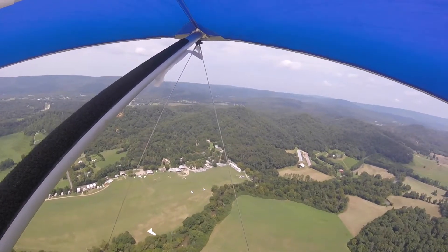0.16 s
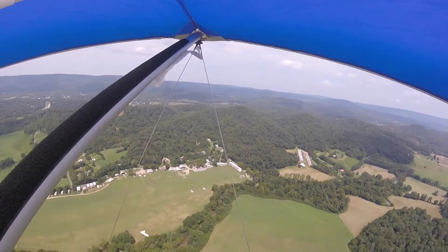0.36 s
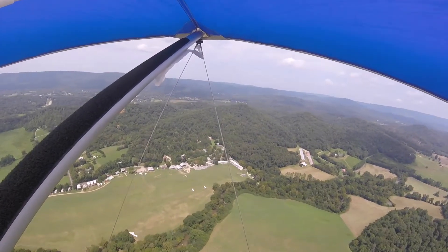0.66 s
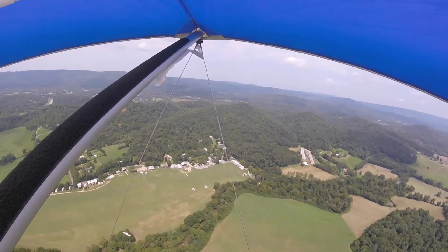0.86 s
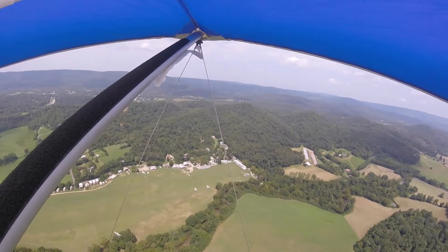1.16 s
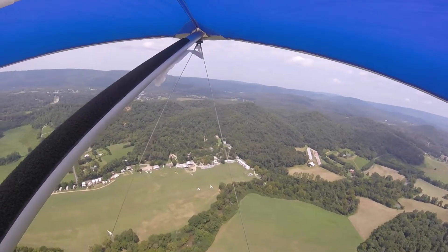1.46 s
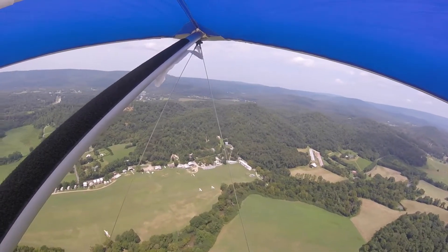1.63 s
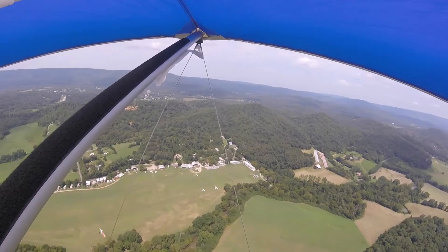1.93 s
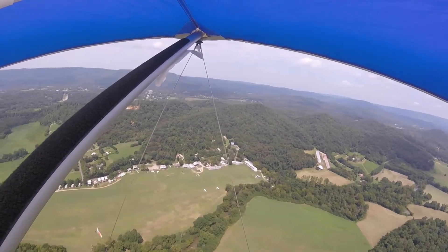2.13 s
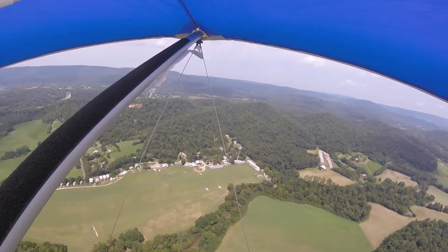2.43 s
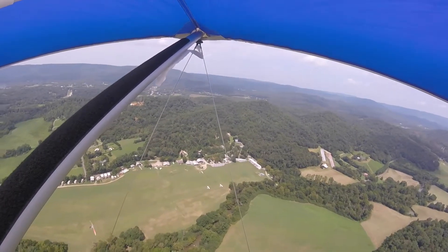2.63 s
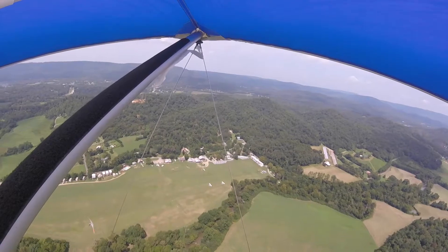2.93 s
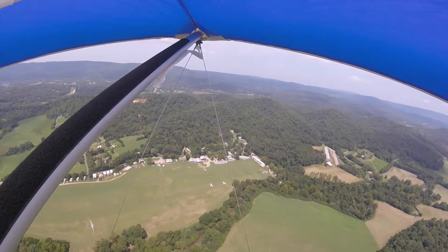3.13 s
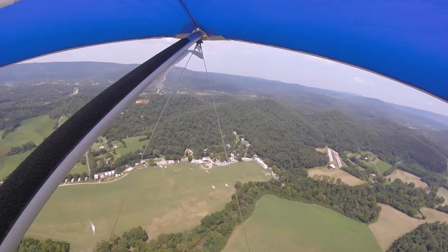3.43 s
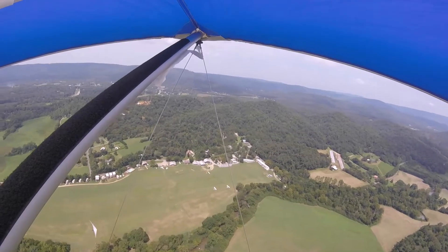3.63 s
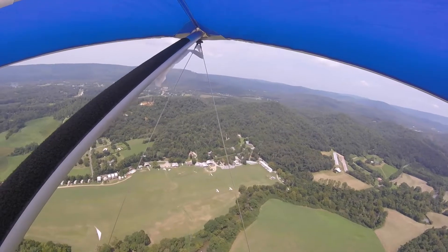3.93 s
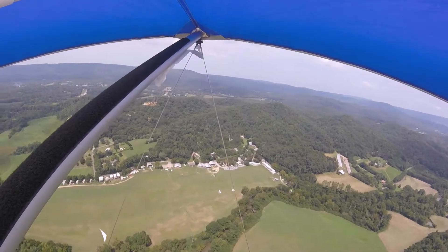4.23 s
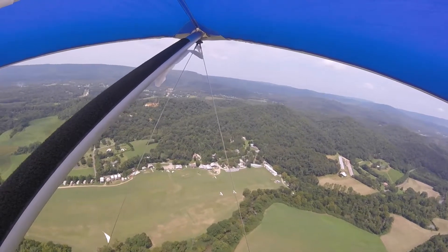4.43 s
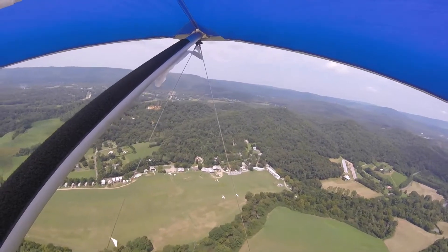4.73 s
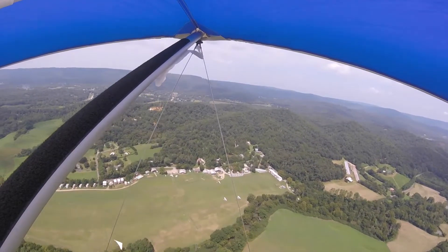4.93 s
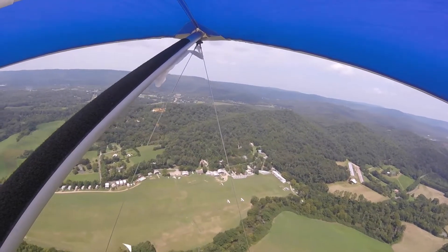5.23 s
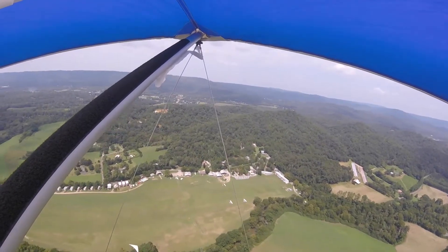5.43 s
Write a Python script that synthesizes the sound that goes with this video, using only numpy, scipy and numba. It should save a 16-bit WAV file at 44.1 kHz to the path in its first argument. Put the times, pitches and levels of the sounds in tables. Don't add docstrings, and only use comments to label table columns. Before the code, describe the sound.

Close, dry outdoor wind on a small microphone mounted under a hang glider's wing, with no echo. From 0 to about 1.6 seconds, deep irregular rumble and crowded low thumps dominate, strongest around 0.8 to 1.4, while a loose sail edge flaps about 21 times a second, a quick buzzing flutter with a papery snap, hollow cloth tone and low tube ring. A tiny sharp tick from a fitting comes at 1.3. From 1.7 to 3 the gusts calm and the flutter is softer and uneven, nearly fading just before 3. From 3.1 it returns as a fairly regular, firmer purr with brief dips, over scattered soft bumps, with very faint ticks at 3.7 and 4.4. Heavier blows hit at about 4.9 and 5.15, and a strong low gust closes at 5.55. Steady soft hiss with a faint high whistle runs throughout, slightly brighter from 3.6.

```python
import sys
import numpy as np
from scipy import signal
from scipy.fft import rfft, irfft
from scipy.io import wavfile
from scipy.ndimage import uniform_filter1d
from numba import njit

SR = 44100
rng = np.random.default_rng(int(sys.argv[2]) if len(sys.argv) > 2 else 0)


def master_out(mix):
    frames = np.transpose(np.atleast_2d(mix))
    ceiling = np.clip(frames, -1, 1)
    pcm = np.round(ceiling * 32767).astype(np.int16)
    wavfile.write(sys.argv[1], SR, pcm)


def voltage_ratio(level):
    return 10 ** (np.asarray(level, float) / 20)


N = 245637

# start_s [s], level_db [dB]
AIRSPEED = [
    (0.0, -59.5),
    (0.08, -62),
    (1.19, -61),
    (1.42, -63),
    (3.59, -60.5),
    (4.82, -60),
    (5.5, -61),
    (5.55, -61.5),
]
# pitch_hz [Hz], density_db [dB per Hz]
RUSH_COLOUR = [(200, 3), (400, 4.5), (800, -1.5), (1100, -9), (1500, -13.5), (2100, -20)]
# pitch_hz [Hz], density_db [dB per Hz]
HISS_COLOUR = [(880, -32.5), (1500, -9), (2430, -6), (3930, -2.5), (5050, -9.5), (5960, -8.5), (6480, -2.5),
               (7240, -12), (9210, -18), (10200, -25), (12100, -21), (13700, -26.5)]
# start_s [s], peak_db [dB]
TICKS = [
    (1.298, -26),
    (3.735, -41),
]
# start_s [s], strength_db [dB], finer_share_db [dB]
GUST = [(0, -25.5, -9.5), (.3, -33.5, -3.5), (.55, -24, -16), (.9, -27.5, -6), (1.15, -26.5, -7),
        (1.62, -26.5, -10), (1.72, -31.5, -16), (2.3, -34.5, -14.5), (2.65, -34.5, -14.5),
        (2.82, -28, -15.5), (3.1, -31.5, -20.5), (3.42, -31.5, -7), (3.72, -32.5, -11), (4.1, -34, -11),
        (4.6, -31.5, -14.5), (4.98, -32.5, -13), (5.35, -36, -10.5), (5.57, -17.5, -30)]
# pitch_hz [Hz], density_db [dB per Hz]
EDDY_COLOUR = [(15, 0), (32, -1), (75, -2), (110, 1.5), (170, -4.5), (250, -4), (350, -14.5), (550, -25),
               (800, -46)]
# centre_s [s], height_db [dB], half_width_ms [ms]
PUSHES = [(0.008, -22, 22), (0.021, -21, 2.8), (0.051, -21, 2.6), (0.066, -15, 3.3),
          (0.075, -19, 2.2), (0.215, -21, 2.2), (0.229, -16.5, 3.3), (0.278, -18.5, 1.9),
          (0.3, -15.5, 3.9), (0.341, -22, 4.4), (0.356, -13.5, 2.5), (0.392, -20, 2.5),
          (0.417, -15.4, 3.3), (0.438, -18.5, 3), (0.45, -16, 5.4), (0.48, -15.3, 2.4),
          (0.525, -12.5, 4), (0.566, -13.5, 3.1), (0.603, -12, 3.3), (0.659, -13.3, 2.7),
          (0.713, -12.5, 1.7), (0.76, -16, 3.6), (0.776, -19, 1.9), (0.797, -13, 2.4),
          (0.833, -8.5, 2.4), (0.864, -13.5, 2.9), (0.895, -14, 2.5), (0.909, -17.5, 2.4),
          (0.967, -15, 2.8), (1.002, -13.5, 7.5), (1.054, -10.5, 2.1), (1.063, -14.5, 3.1),
          (1.097, -14, 1.5), (1.118, -13, 4.6), (1.151, -8, 1.53), (1.166, -10.5, 3.3),
          (1.182, -19, 4.9), (1.205, -14, 2.8), (1.229, -19, 2.1), (1.281, -12, 1.8),
          (1.336, -13.5, 3.3), (1.366, -16.4, 1.5), (1.376, -13.4, 2), (1.44, -12, 3.7),
          (1.468, -19.5, 7.5), (1.474, -19, 3), (1.553, -18, 2.7), (1.601, -19.7, 5.6),
          (1.625, -21, 4.9), (1.632, -11.5, 2.2), (1.657, -18, 3.2), (1.812, -27, 3.3),
          (1.966, -22, 3.7), (2.06, -20.5, 6.4), (2.167, -27.3, 5), (2.19, -23.3, 8.5),
          (2.326, -23.5, 8.7), (2.439, -23, 3.9),
          (2.535, -29, 8.3), (2.586, -17, 3.1), (2.737, -24.5, 3.6), (2.78, -22.7, 2.1),
               (2.789, -15.1, 2.16), (2.84, -25, 2.5), (2.914, -30, 6.4), (3.038, -21.4, 5.4),
               (3.063, -22.5, 4.4), (3.194, -16.5, 5.3), (3.238, -20.5, 6.6), (3.264, -24, 6.7),
               (3.644, -20.5, 7), (3.71, -25, 5.8), (3.763, -26, 6.5), (3.951, -29, 7.3), (4.077, -28, 1.5),
               (4.145, -20.5, 5.5), (4.182, -25, 4.4), (4.24, -23, 10), (4.379, -18.5, 3.4),
               (4.418, -23, 6.5), (4.467, -25, 2.5), (4.67, -20, 5.6), (4.715, -20.1, 6.3),
               (4.832, -21, 7.6), (4.854, -19.5, 5.4), (4.884, -14.5, 3.3), (4.894, -10, 2.05),
               (4.901, -17, 1.9), (4.929, -20.3, 4.6), (4.981, -20.5, 3.5), (5.029, -15.5, 3.3),
               (5.038, -11.5, 4.6), (5.153, -16, 2.7), (5.164, -26, 10), (5.295, -24, 5.5),
               (5.347, -26, 6.3), (5.5, -19.5, 3.6), (5.56, -17, 4.3), (5.561, -11.5, 1.7)]
# centre_s [s], depth_db [dB], half_width_ms [ms]
PULLS = [(0.006, -17, 1.53), (0.078, -17, 7), (0.091, -20.3, 3.8), (0.109, -21.5, 5.8),
         (0.152, -14, 1.4), (0.165, -14.5, 1.7), (0.169, -19.7, 5.1), (0.235, -20, 3.7),
         (0.247, -18.5, 2.8), (0.299, -13, 1.65), (0.367, -20, 2.7), (0.377, -19.2, 2.5),
         (0.459, -22, 1.9), (0.465, -17, 1.5), (0.506, -18, 4.6), (0.666, -22, 2.3),
         (0.686, -19.4, 2.3), (0.707, -19, 4.8), (0.789, -13, 5.5), (0.805, -13, 1.43),
         (0.837, -14.5, 2.5), (0.847, -9, 1.6), (0.879, -19, 2.3), (0.934, -22, 3.4),
         (0.946, -19, 4.1), (0.95, -17, 2), (1.033, -18, 3.8), (1.039, -13, 2.2), (1.08, -14, 2.5),
         (1.133, -11.5, 2.2), (1.246, -11.5, 2.6), (1.266, -11, 3.3), (1.274, -10, 1.9),
         (1.293, -22, 3.3), (1.304, -9.5, 3.7), (1.353, -7.5, 3.2), (1.399, -16, 3.1),
         (1.445, -22, 2.5), (1.518, -14.9, 3.7), (1.574, -19, 1.9), (1.734, -27.5, 8.2),
         (1.783, -24, 3.8), (1.84, -23.5, 5.7), (1.994, -20.5, 8.4), (2.041, -26, 8.6),
         (2.142, -25, 4.2), (2.254, -32, 10), (2.346, -35, 4.4), (2.41, -29, 3.5), (2.46, -23, 8),
         (2.557, -21, 4.2), (2.606, -20, 8.4), (2.633, -23, 2.7), (2.658, -18.8, 4.5),
              (2.768, -20, 3.4), (2.794, -16, 1.43), (2.804, -20, 3.8), (2.852, -20, 5.4),
              (2.939, -17.5, 2.7), (2.96, -19.5, 3.8), (2.989, -27, 5.1), (3.23, -16, 2.5),
              (3.306, -18.8, 2.1), (3.351, -16, 7.5), (3.385, -11, 2.4), (3.401, -14.5, 5.7),
              (3.449, -12.5, 3.4), (3.471, -20, 2.6), (3.488, -24, 3), (3.54, -18.5, 4.4),
              (3.569, -16.3, 4.7), (3.589, -28, 5.8), (3.678, -20, 4), (3.79, -17, 5.2),
              (3.807, -16.5, 2.3), (3.831, -18.5, 7.5), (3.874, -18.5, 5.1), (3.899, -17.5, 4.6),
              (3.923, -14, 3), (4.017, -17.7, 4.9), (4.046, -24.0, 6.1), (4.087, -21, 3.1), (4.128, -21, 3),
              (4.135, -17.5, 2.9), (4.333, -13.5, 2), (4.358, -20.6, 4.4), (4.387, -25, 2.4),
              (4.436, -26, 2.8), (4.504, -25, 7.5), (4.543, -21, 5), (4.583, -17, 4.6), (4.606, -23.5, 9.5),
              (4.769, -24, 2.3), (4.813, -16, 3.3), (4.905, -14, 8.3), (5.11, -21, 4.9), (5.137, -16, 1.95),
              (5.141, -7.5, 1.98), (5.161, -8, 2.3), (5.175, -14, 3.1), (5.219, -14.5, 2.8),
              (5.237, -20, 4.8), (5.449, -21, 4.2), (5.469, -19.2, 4.4), (5.488, -23, 7.5),
              (5.514, -14.5, 2.4), (5.532, -18, 5.3), (5.554, -7, 2.25),
         (5.571, -23.5, 1.6),
]
# start_s [s], strength_db [dB], extra_crack_db [dB]
SNAPS = [(0.05, -36.5, 1.5), (0.1, -33, 1.5), (0.148, -29, 1.5), (0.198, -35, 1.5),
         (0.245, -31.5, 1.5), (0.289, -31.5, 1), (0.338, -32, -1), (0.386, -35, 3), (0.437, -40, -3),
         (0.485, -38.5, -2), (0.581, -43.5, 1.5), (0.62, -41, -1), (0.666, -32, -1), (0.712, -31, -1),
         (0.768, -33.5, -2), (0.818, -31, 0), (0.865, -30.5, -0.5), (0.916, -31, 2.5),
         (0.961, -27, -2.5), (1.014, -37, -1), (1.056, -35, -1), (1.176, -47, 1.5), (1.252, -37, 1.5),
         (1.296, -34, -10), (1.356, -29.5, 1), (1.408, -38, 2), (1.457, -43, 7), (1.512, -37, 2),
         (1.562, -39, 4), (1.618, -36, 3), (1.668, -39, 1.5), (1.715, -37.5, 1.5), (1.766, -45, 4),
         (1.807, -49, -2), (1.859, -48, -1),
         (1.888, -37, -1.5), (1.935, -32.5, -1.5), (1.984, -34.5, -1.5), (2.026, -36.5, -1.5),
             (2.072, -38, -1.5), (2.121, -41.5, -1.5), (2.167, -36, -1.5), (2.224, -35, -1.5),
             (2.28, -30.5, -1.5), (2.331, -35, -1.5), (2.383, -35, -1.5), (2.427, -31.5, -1.5),
             (2.473, -37, -1.5), (2.529, -34, -1.5), (2.573, -38.5, -1.5), (2.627, -44, -1.5),
             (2.73, -42.5, -1.5), (2.777, -34.5, -1.5), (2.871, -46, -1.5),
         (2.961, -50, -1.5), (3.045, -38, -1.5), (3.098, -34, -1.5), (3.208, -39.5, -1.5),
              (3.255, -33, -1.5), (3.306, -34, -1.5), (3.351, -31, -1.5), (3.398, -30.5, -1.5),
              (3.444, -32.5, -1.5), (3.486, -47, -1.5), (3.562, -34, -1.5), (3.603, -35.5, -1.5),
              (3.65, -38, -1.5), (3.701, -44, -1.5), (3.751, -38, -1.5), (3.799, -33, -1.5),
              (3.846, -31, -1.5), (3.894, -30, -1.5), (3.939, -27.5, -1.5), (3.985, -28, -1.5),
              (4.026, -36, -1.5), (4.07, -29, -1.5), (4.114, -30.5, -1.5), (4.158, -34.5, -1.5),
              (4.23, -38.5, -1.5), (4.278, -34, -1.5), (4.333, -33.5, -1.5), (4.378, -30.5, -1.5),
              (4.425, -31, -1.5), (4.472, -28, -1.5), (4.516, -32, -1.5), (4.566, -34, -1.5),
              (4.611, -37, -1.5), (4.664, -37, -1.5), (4.708, -33, -1.5), (4.756, -29, -1.5),
              (4.803, -30, -1.5), (4.848, -29.5, -1.5), (4.895, -33, -1.5), (4.939, -46, -1.5),
              (4.987, -41.5, -1.5), (5.042, -35, -1.5), (5.093, -35.5, -1.5), (5.138, -31.5, -1.5),
              (5.184, -30, -1.5), (5.228, -30, -1.5), (5.275, -27.5, -1.5), (5.321, -29.5, -1.5),
              (5.365, -31, -1.5), (5.407, -36, -1.5), (5.464, -44.5, -1.5), (5.514, -30, -1.5),
         (5.561, -30, 0.1),
]
# pitch_hz [Hz], width_hz [Hz], level_db [dB]
FRAME_MODES = [(111.5, 9.4, 24.5), (251.2, 22.6, 7), (269.3, 14, 0.5), (318.4, 45, 7.5)]
# pitch_hz [Hz], width_hz [Hz], level_db [dB]
CLOTH_MODES = [(454, 175, 4), (534, 20, 2), (614, 59, -4.5), (710, 13, -3), (1068, 80, 12.5)]
# pitch_hz [Hz], width_hz [Hz], level_db [dB]
EDGE_MODES = [(930, 230, 10), (1310, 350, 6), (1885, 290, 8.5)]
# pitch_hz [Hz], density_db [dB per Hz]
RUSTLE_COLOUR = [(250, -11), (450, 8.5), (850, 8.5), (1250, -3), (1650, -30.5), (3000, -39.5)]
COARSE_S = [.09, .6, .66, 1.72, 1.84, 1.97, 2.61, 2.74, 2.96, 3.19, 3.45, 3.57, 3.8, 4.03, 5.05]


def level(x, db):
    return x * voltage_ratio(db) / np.sqrt(np.mean(x ** 2))


@njit
def bandpass(x, hz, width):
    y, band, low = np.empty(len(x)), 0., 0.
    g, damping = np.tan(np.pi * hz / SR), width / hz
    for i in range(len(x)):
        v = (band + g * (x[i] - low)) / (1 + g * (g + damping))
        band, low = 2 * v - band, low + 2 * g * v
        y[i] = damping * v
    return y


def ring(x, modes):
    drive = x + 1e-18
    return sum(voltage_ratio(db) * bandpass(drive, 1. * hz, 1. * width) for hz, width, db in modes)


def curves(table):
    s, *columns = np.transpose(table)
    return [np.interp(np.arange(N) / SR, s, column) for column in columns]


def walk(rate):
    hold = int(SR / rate)
    steps = np.repeat(rng.standard_normal(N // hold + 1), hold)
    return 1.3 * uniform_filter1d(uniform_filter1d(steps, hold), hold)[:N]


def noise(colour, lo_hz=0, hi_hz=SR):
    hz = np.fft.rfftfreq(N, 1 / SR) + 1
    points = np.array(colour)
    gain = voltage_ratio(np.interp(np.log(hz), np.log(points[:, 0]), points[:, 1]))
    edges = 1 / np.sqrt((1 + (lo_hz / hz) ** 8) * (1 + (hz / hi_hz) ** 8))
    return irfft(rfft(rng.standard_normal(N)) * gain * edges, N)


def strikes(seconds, db):
    x = np.zeros(N)
    x[np.clip((np.asarray(seconds) * SR).astype(int), 0, N - 1)] = voltage_ratio(np.asarray(db))
    return x


def shape(x, kernel, lead=0):
    return signal.fftconvolve(x, kernel)[lead:N + lead]


def even(x, span_s, share):
    power = uniform_filter1d(x ** 2, int(span_s * SR))
    return x / power ** (np.clip(share, 0, 1) / 2)


def airflow():
    hiss_db, = curves(AIRSPEED)
    rush_db = -52 + 1.82 * (hiss_db + 60.5)
    hiss = level(noise(HISS_COLOUR), 0.17) * voltage_ratio(hiss_db + 0.3 * walk(14))
    tone = bandpass(rng.standard_normal(N), 6470.0, 160.0)
    whistle = level(tone, -14.0) * voltage_ratio(hiss_db + 2.0 * walk(10))
    rush = level(noise(RUSH_COLOUR, 243, 2800), 2.7) * voltage_ratio(rush_db + 0.5 * walk(22))
    return hiss + whistle + rush


def rigging():
    s, db = np.transpose(TICKS)
    t = np.arange(300) / SR
    step = shape(strikes(s, db), -np.exp(-t / .00025) * (1 - np.exp(-t / .00008)))
    ping_s, ping_db, ping_hz, width_hz = 4.4205, -32, 8300, 1800
    blow = strikes([ping_s], [ping_db])
    for hz in (ping_hz, ping_hz * .55):
        mode = [(hz, width_hz, 0)]
        step = step + ring(ring(blow, mode), mode)
    return step


def eddy_levels():
    buffet_offset_db, small_offset_db, small_follows = 4, -3, 0.92
    gust_db, finer_share_db = curves(GUST)
    fine_db = gust_db + finer_share_db
    small_db = fine_db.mean() + small_follows * (fine_db - fine_db.mean())
    steady = gust_db, fine_db + buffet_offset_db, small_db + small_offset_db
    return [db + patchy_db * walk(40) for db, patchy_db in zip(steady, (.7, 2.4, 2.4))]


def eddies():
    rumble_db, buffet_db, small_db = eddy_levels()
    puff = walk(35)
    rumble = even(noise(EDDY_COLOUR, 12, 72), .07, .7)
    buffet = even(noise(EDDY_COLOUR, 72, 190), .05, .75)
    small = even(noise(EDDY_COLOUR, 190, 700), .04, .7)
    return (level(rumble, -5.0) * voltage_ratio(rumble_db + 0.2 * puff)
            + level(buffet, -0.3) * voltage_ratio(buffet_db + 3.1 * puff)
            + level(small, -1.9) * voltage_ratio(small_db + 1.77 * puff + 1.2 * walk(64)))


def bursts():
    pushes = PUSHES
    pulls = PULLS
    t, out = np.arange(N) / SR, np.zeros(N)
    for sign, table in ((1, pushes), (-1, pulls)):
        for s, db, half_ms in table:
            near = slice(max(int((s - .05) * SR), 0), int((s + .05) * SR))
            widths = (t[near] - s) * 1000 / half_ms
            core = np.exp(-widths ** 2)
            surround = np.exp(-(widths / 3) ** 2) / 3
            out[near] += sign * voltage_ratio(db) * (core - surround)
    return out


def flaps():
    s, db, extra_db = np.transpose(SNAPS)
    db = db + 4.5
    over_usual_db = db + 30
    ring_db = 2.5 - 0.15 * over_usual_db + 1 * rng.standard_normal(len(s))
    crack_db = -25.5 + 0.05 * over_usual_db + extra_db
    return s, db, ring_db, crack_db


def sail(delay_s=0.00302):
    s, db, ring_db, crack_db = flaps()
    s = s + delay_s
    snaps = strikes(s, db)

    t = np.arange(-100, 100) / SR
    suction = -np.exp(-(t / 0.0005) ** 2)
    return_s = s + 0.013 + .0012 * rng.standard_normal(len(s))
    returns = strikes(return_s, db - 12.5)
    cloth = ring(shape(snaps + returns, suction, lead=100), CLOTH_MODES)
    frame = ring(shape(strikes(s, db + ring_db), suction, lead=100), FRAME_MODES)

    flick = np.exp(-(t / .0002) ** 2)
    taut = strikes(s + 0.00058, db + crack_db + 9.5)
    slack = strikes(s + .0101, db + crack_db + 8.5 - 8)
    crack = ring(shape(taut + slack, flick, lead=100), EDGE_MODES)

    t = np.arange(2500) / SR
    swing_back = shape(snaps, np.exp(-((t - .016) / 0.0087) ** 2))
    rustle = level(noise(RUSTLE_COLOUR), -22.5) * swing_back * voltage_ratio(1.0 * walk(150))

    t = np.arange(-1000, 2000) / SR
    lean_in = voltage_ratio(-3.5) * np.exp(-((t - 0.0088) / 0.01) ** 2)
    pull_out = voltage_ratio(-1) * np.exp(-((t - 0.021) / 0.0083) ** 2)
    sway = shape(snaps, lean_in - pull_out, lead=1000)
    return cloth + frame + crack + rustle + sway


def scene():
    return (airflow() + rigging() + eddies() + bursts() + sail())[None]


def sparse(x, size, top_hz):
    fine = size > 1000
    hz, s, z = signal.stft(x, SR, nperseg=size, window="cosine")
    power = uniform_filter1d(abs(z) ** 2, 2 if fine else 1, axis=0)
    usual = uniform_filter1d(uniform_filter1d(power, size // 64, axis=0), 16384 // size, axis=1)
    bar = (.8 if fine else 1.1) * np.clip((hz[:, None] - 9000) / 1000 + .5, 0, 1)
    below_top = hz[:, None] < np.interp(s * SR, np.arange(N), top_hz)
    keep = (power > bar * usual) & below_top
    return signal.istft(z * keep, SR, nperseg=size, window="cosine")[1][:N]


def band_limit(x):
    return signal.sosfilt(signal.butter(12, 14040, fs=SR, output="sos"), x)


def record(dry):
    t = np.arange(N) / SR
    faded = dry[0] * np.minimum(t / .004, 1) ** 2
    blocked = signal.sosfilt(signal.butter(1, 8, "high", fs=SR, output="sos"), faded)
    top_hz = np.where(t < 5.54, 13800 + 170 * walk(14), SR)
    coarse = np.max([np.clip(3 - abs(t - s) / .012, 0, 1) for s in COARSE_S], axis=0)
    long_blocks = sparse(blocked, size=2048, top_hz=top_hz)
    short_blocks = sparse(blocked, size=256, top_hz=top_hz)
    thinned = (1 - coarse) * long_blocks + coarse * short_blocks
    return band_limit(thinned[None])


dry = scene()
out = record(dry)
master_out(out)
```